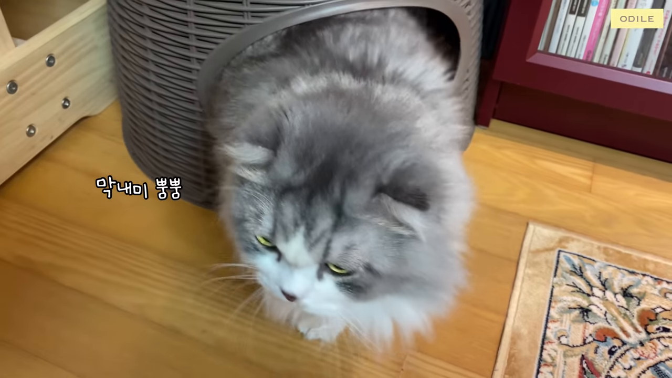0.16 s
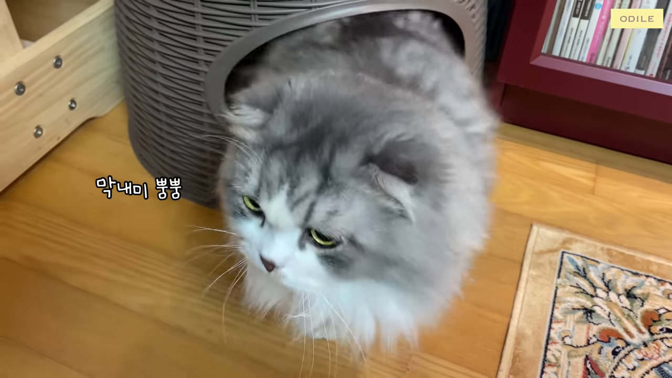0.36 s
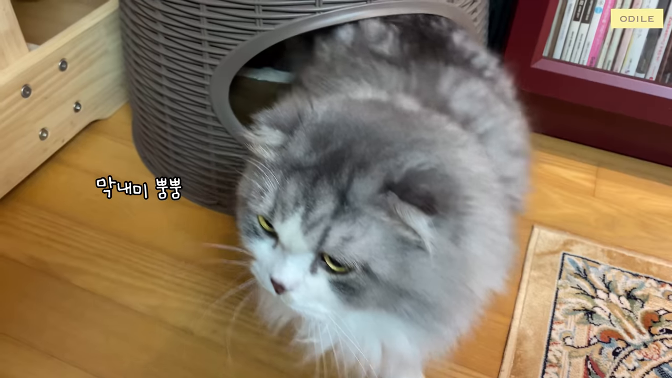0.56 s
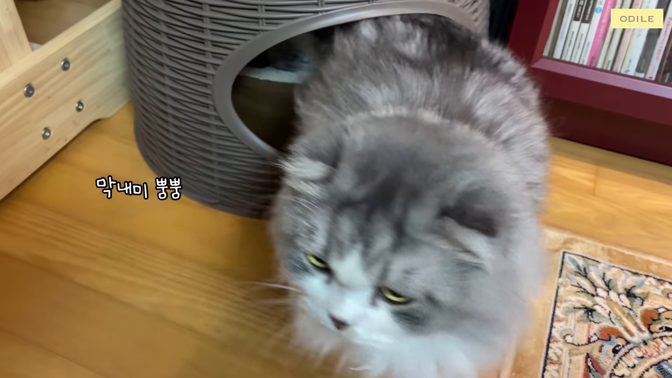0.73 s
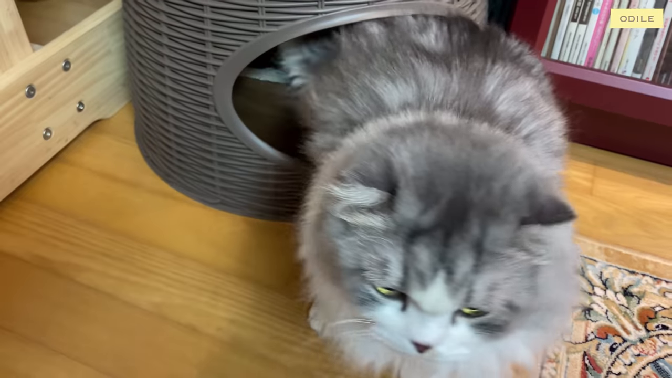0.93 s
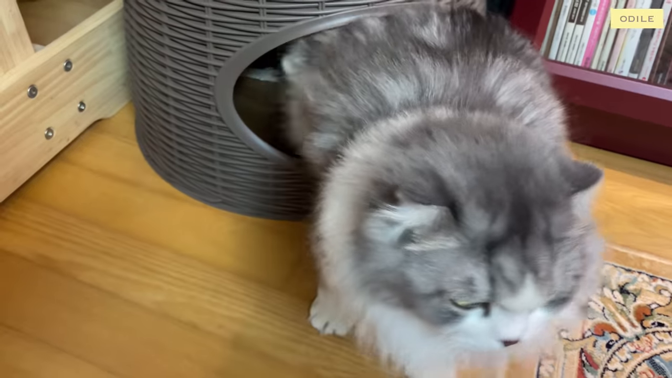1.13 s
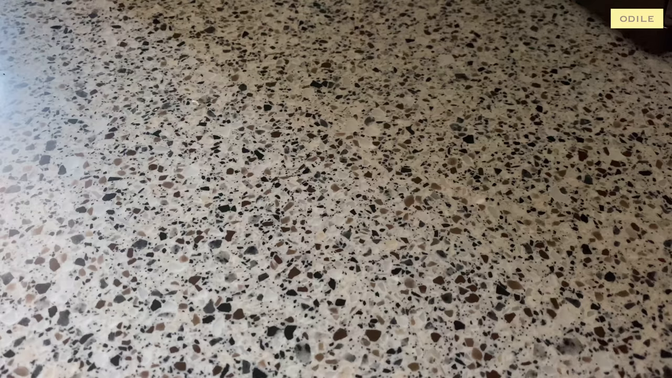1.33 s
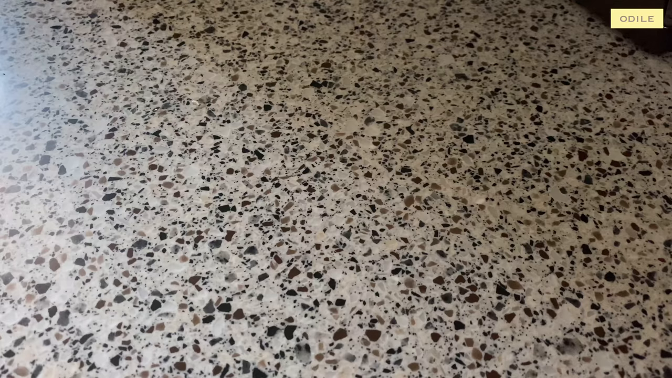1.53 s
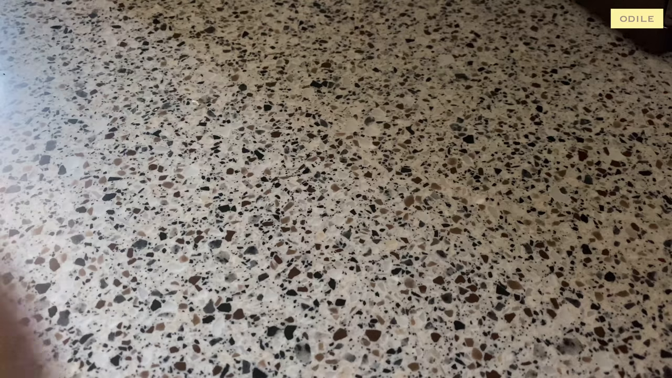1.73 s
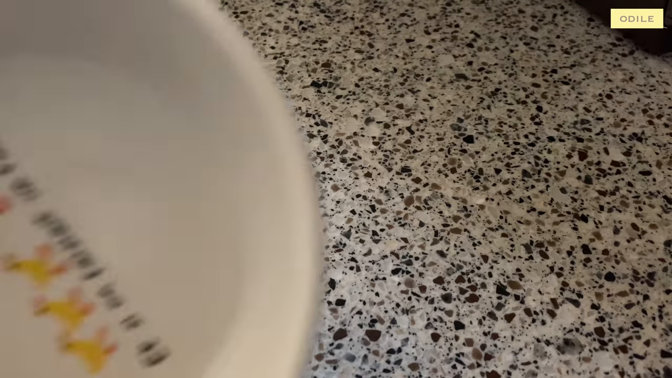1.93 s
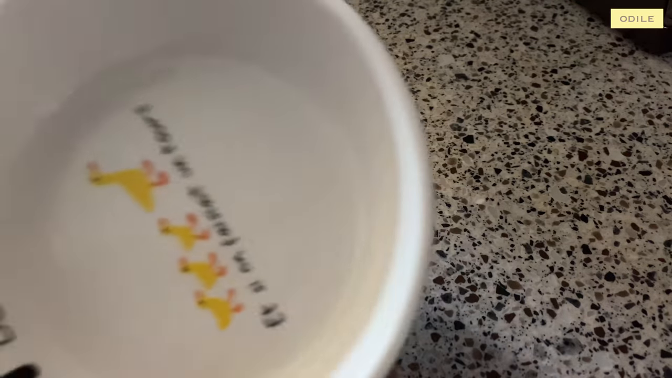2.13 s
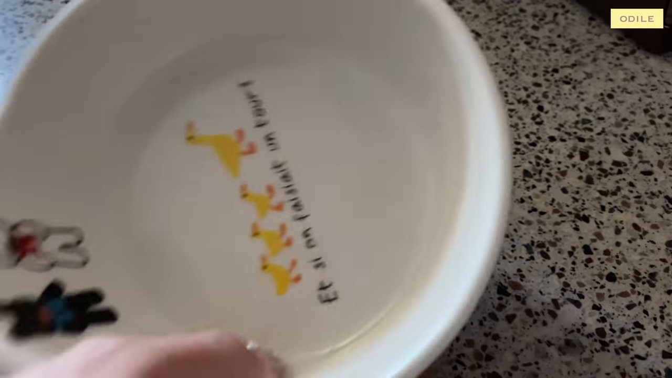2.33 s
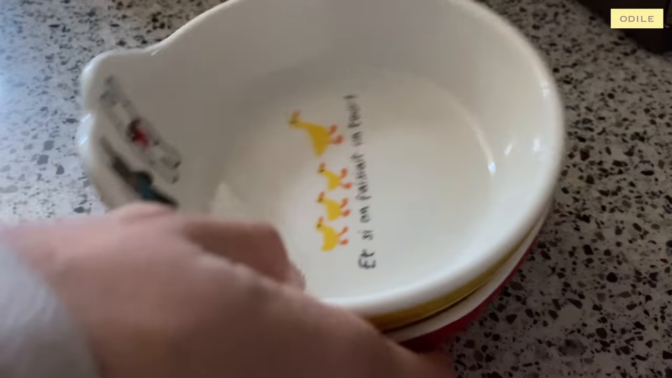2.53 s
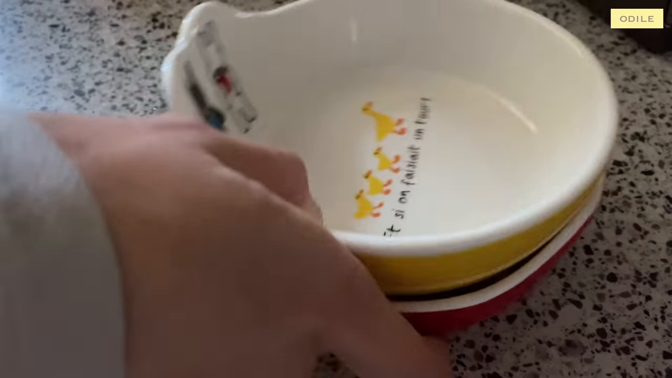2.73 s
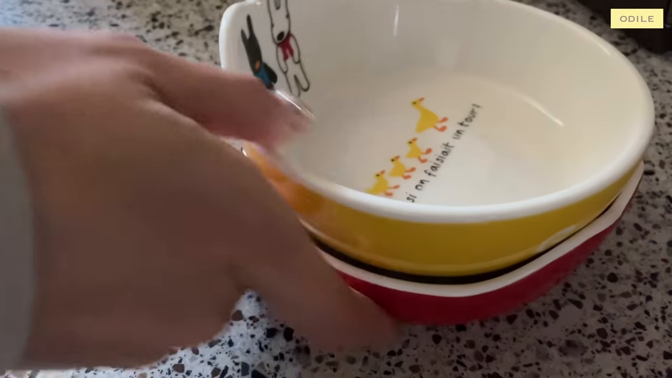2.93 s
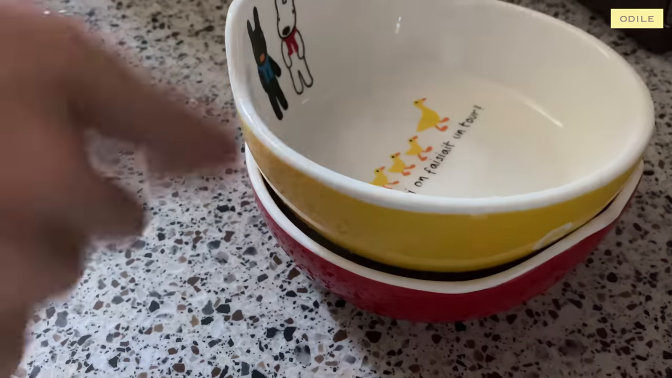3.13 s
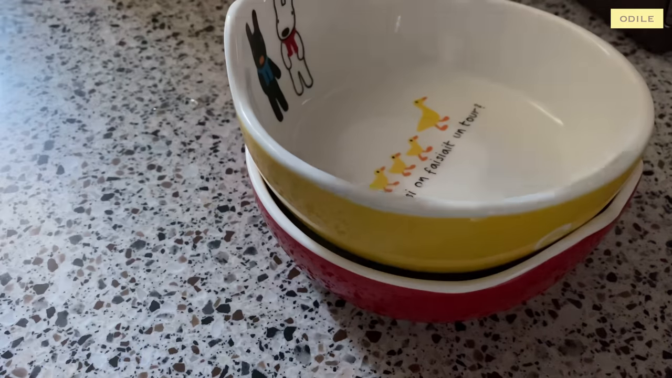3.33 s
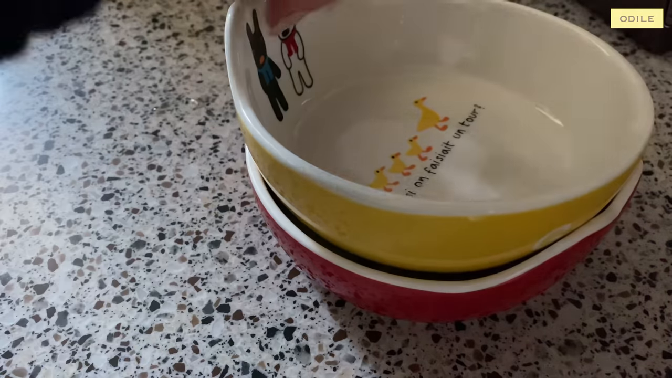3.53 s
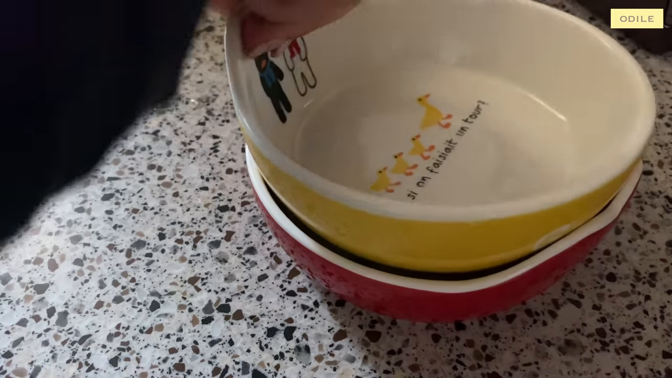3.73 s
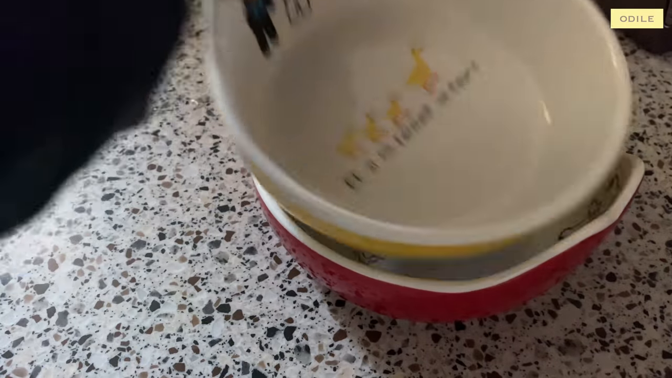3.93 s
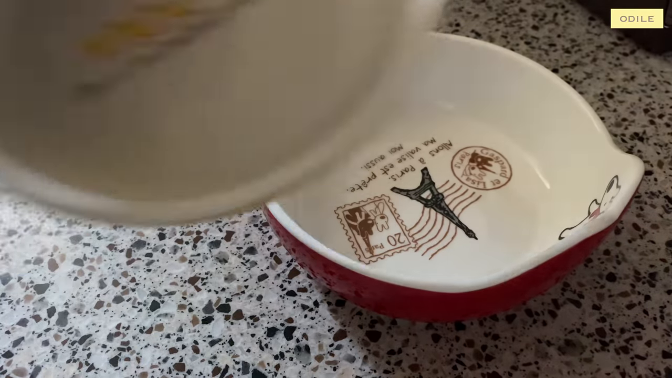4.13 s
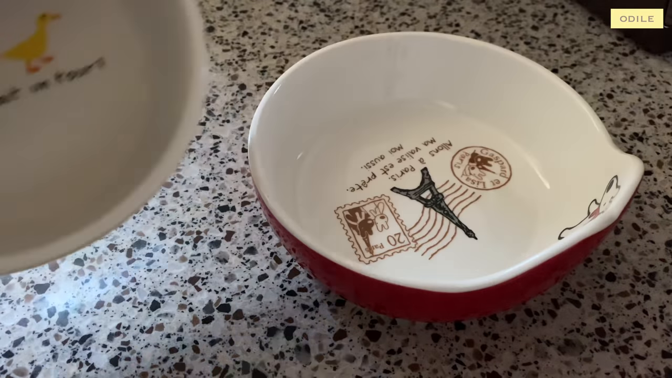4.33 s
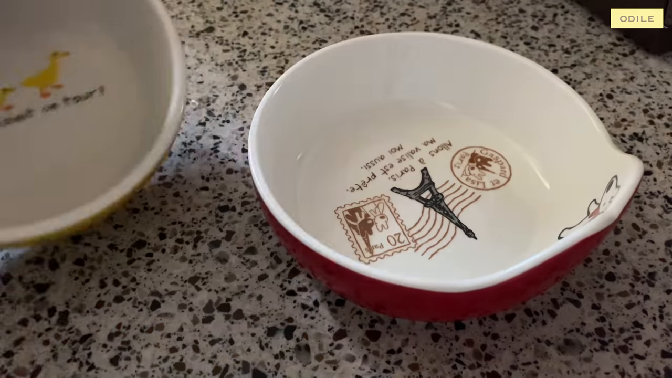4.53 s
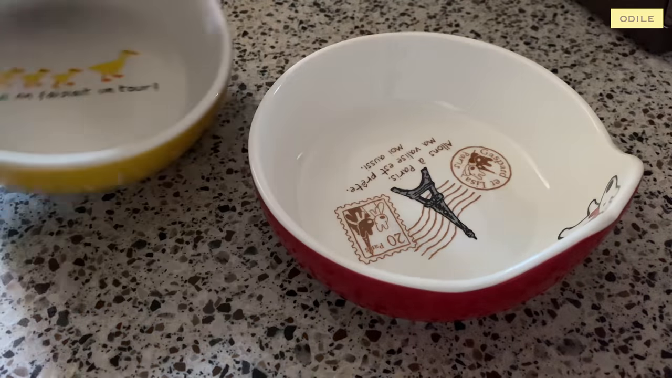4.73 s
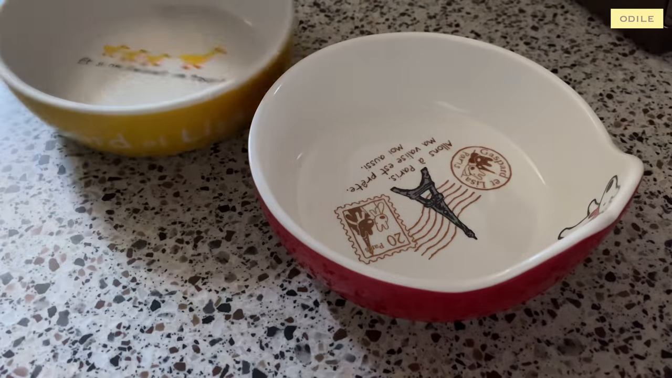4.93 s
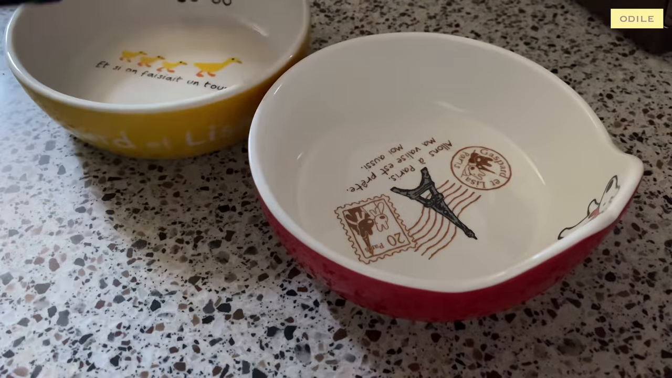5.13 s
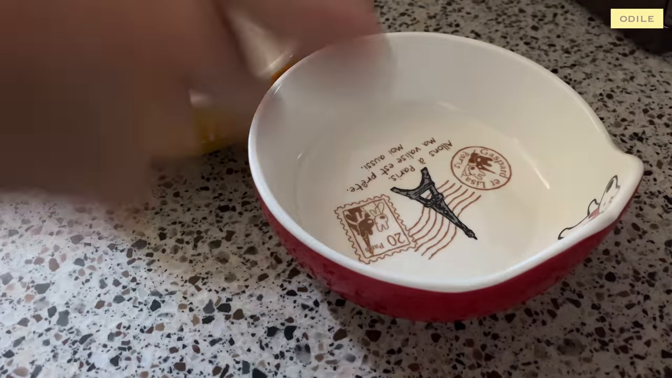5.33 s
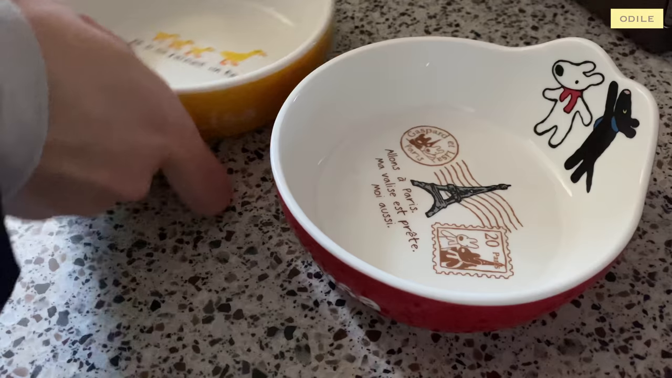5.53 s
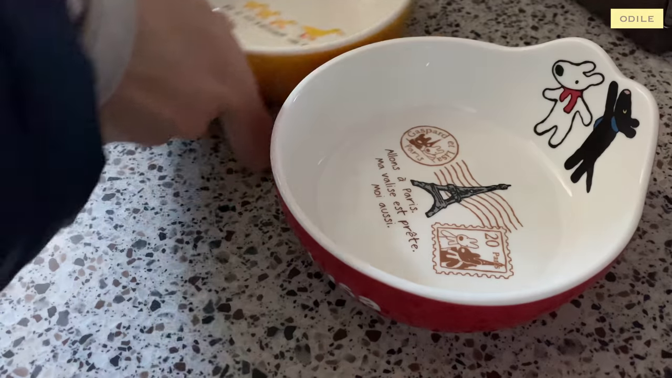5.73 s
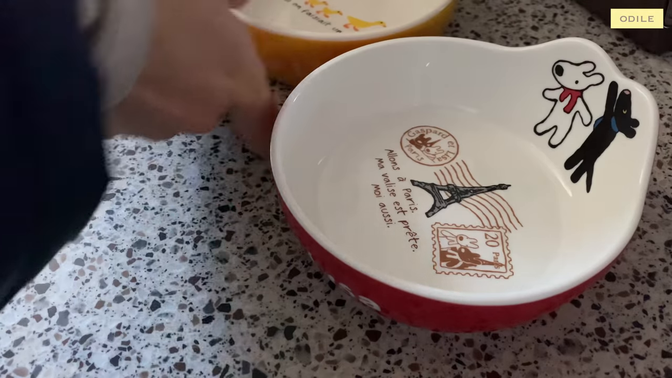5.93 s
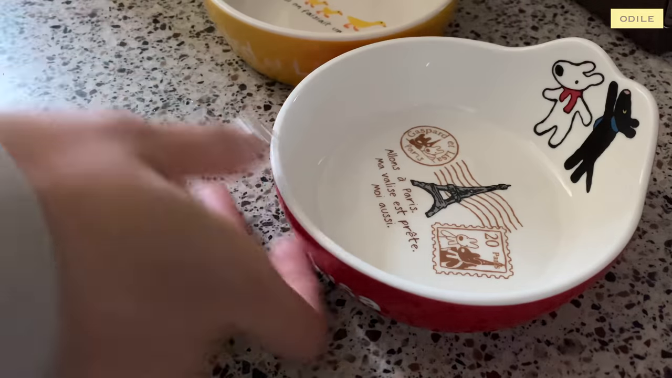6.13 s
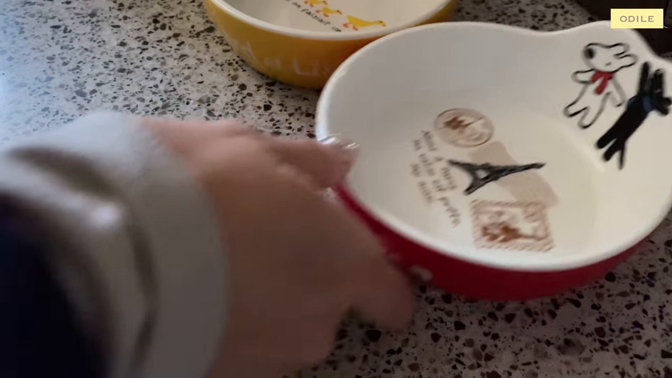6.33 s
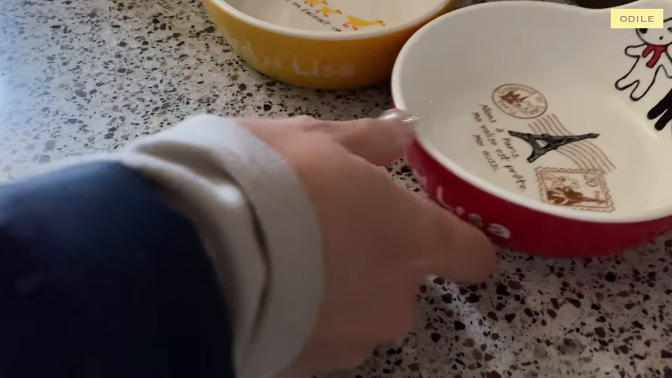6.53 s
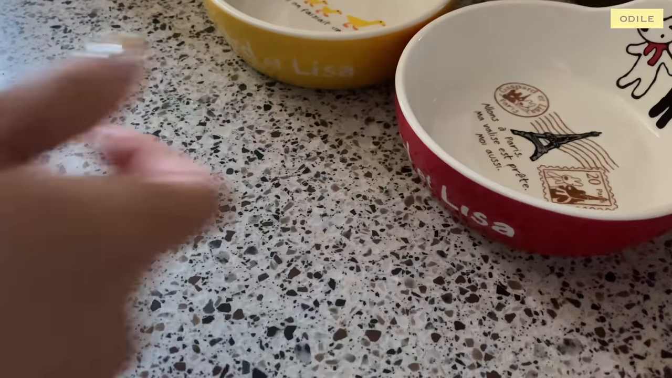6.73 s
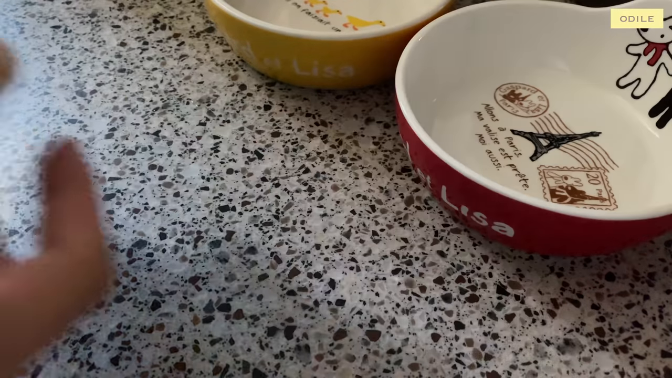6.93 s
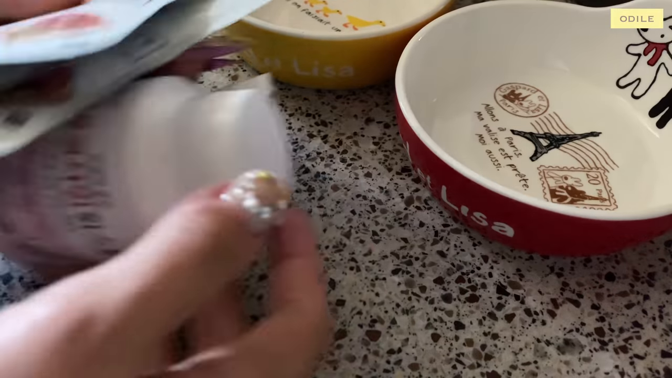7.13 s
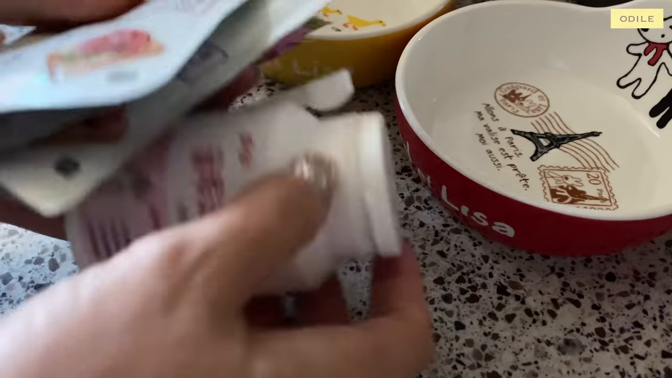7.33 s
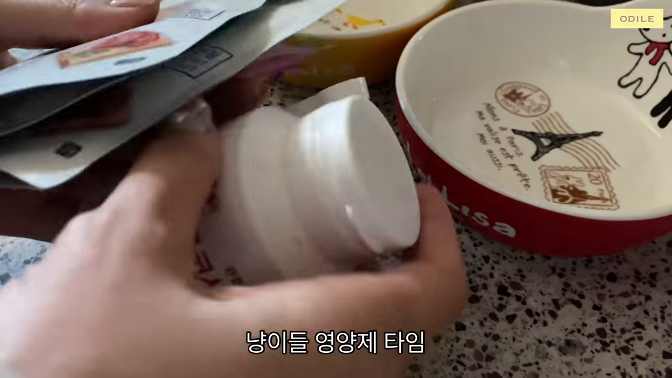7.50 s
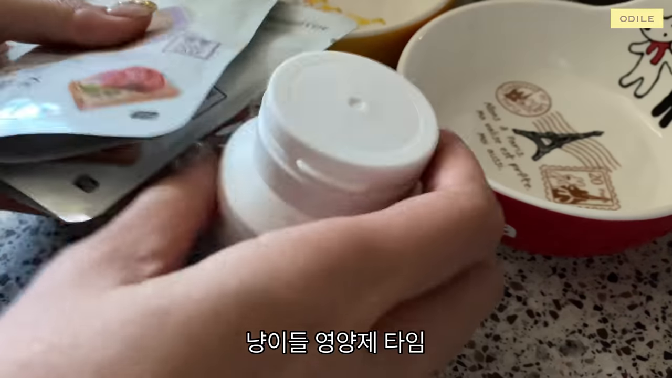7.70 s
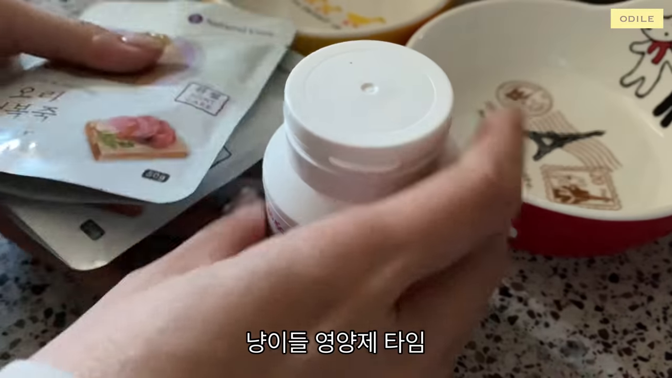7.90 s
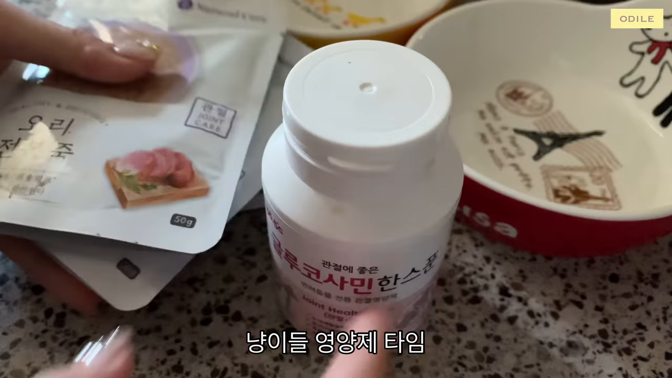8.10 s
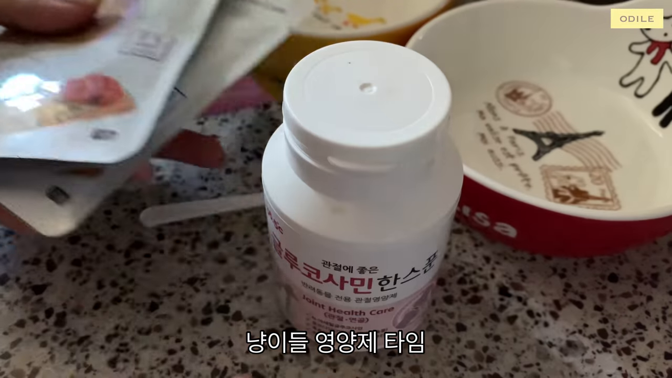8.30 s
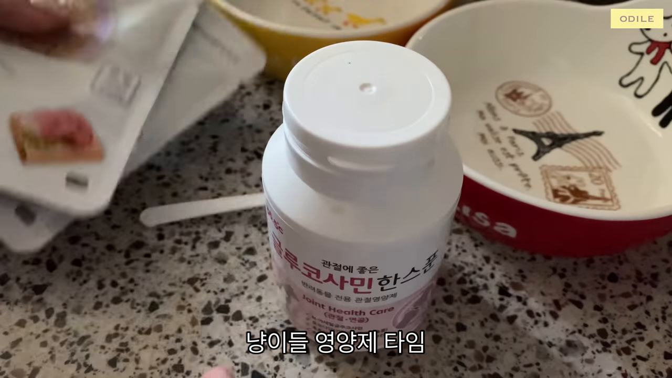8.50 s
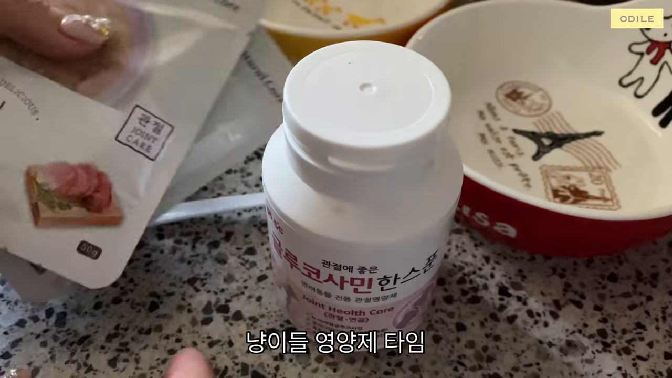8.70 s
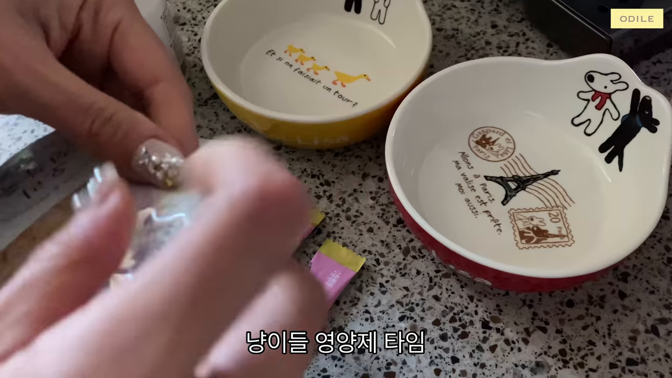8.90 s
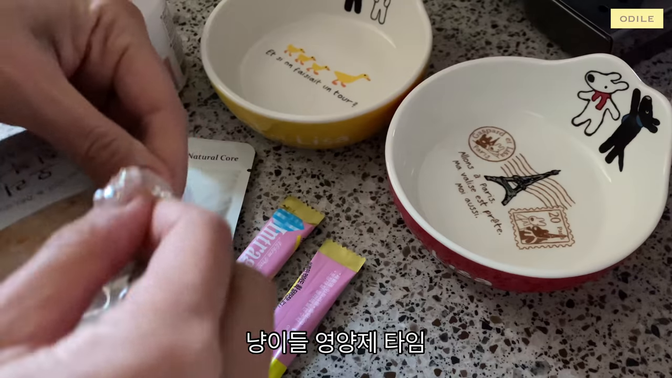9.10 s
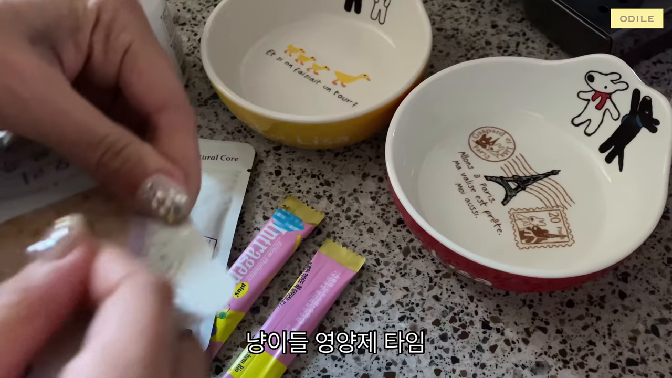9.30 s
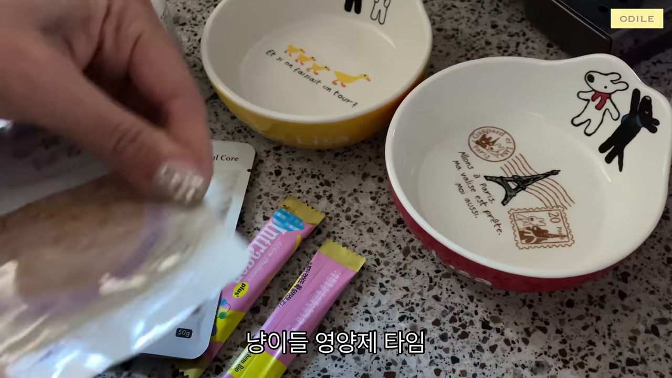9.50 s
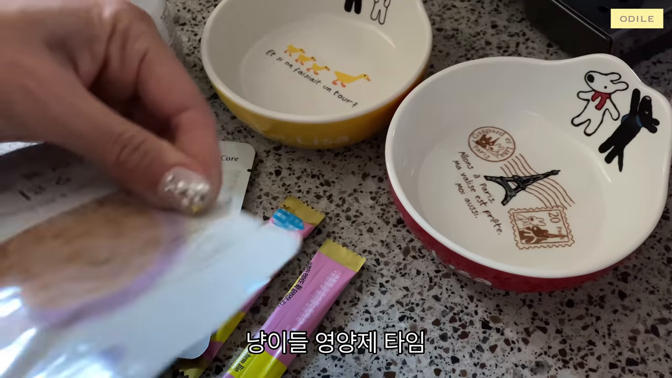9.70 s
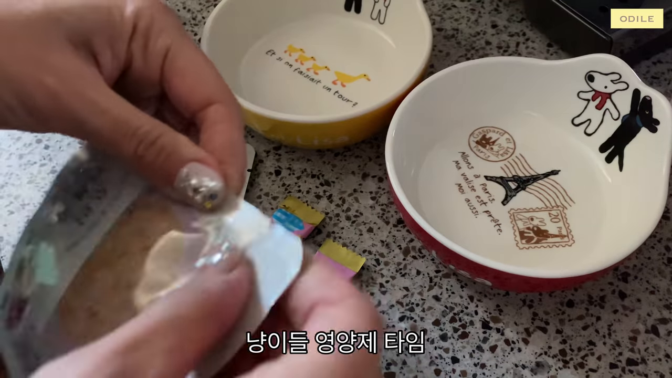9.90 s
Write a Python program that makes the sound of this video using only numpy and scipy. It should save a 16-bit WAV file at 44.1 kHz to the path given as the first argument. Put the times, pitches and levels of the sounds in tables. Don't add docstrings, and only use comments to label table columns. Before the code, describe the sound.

From 0 to 1.3 s, a low fan hum with faint hiss; around 0.45 and 0.8 s a wicker basket is shaken, with soft rumble, creaks and dry strand ticks. The sound cuts to a quiet kitchen with sleeve brushes, close up in stereo with short hard-wall echoes. At 2.1 s nested ceramic bowls land solidly on stone, rattle and slide, then knock sharply at 2.6. Light ticks from 3.6 lead to a bright, longer ringing clink at 3.8 as they part. One bowl lands at 4.4, the other at 4.9, rocking briefly. Gritty turning from 5.5 and a push from 6.15 bring a bright rim knock with quick rebounds at 6.27. Foil rustles from 6.9, with a soft wrist thud at 7.1; a plastic jar lands dully at 7.5 and rocks. Foil creases snap until a short rip at 9.2, then finer crackles to about 9.9.

```python
import sys
import numpy as np
from scipy import signal
from scipy.fft import rfft, irfft, next_fast_len
from scipy.io import wavfile
from scipy.ndimage import uniform_filter1d

SR = 44100
rng = np.random.default_rng(int(sys.argv[2]) if len(sys.argv) > 2 else 0)


def linear_from_db(decibels):
    return 10 ** (np.asarray(decibels, float) / 20)


def bounce(signal):
    frames = np.transpose(np.atleast_2d(signal))
    limited = np.clip(frames, -1, 1)
    pcm = np.round(limited * 32767).astype(np.int16)
    wavfile.write(sys.argv[1], SR, pcm)


N = 438794
CUT_S = 1.31


def unit(x):
    return x / np.sqrt(np.mean(x ** 2))


def add(out, x, s):
    i = int(s * SR)
    out[:, i:i + x.shape[1]] += x[:, :N - i]


def noise(colour, like=0.035, grit_db=0.):
    hz, db = np.transpose(colour)
    size = next_fast_len(N)
    grains = np.minimum(rng.exponential(size=size), 6)
    x = rng.standard_normal((3, size)) * linear_from_db(grit_db * grains)
    like = np.clip(like, 0, 1)
    x = np.sqrt(like) * x[0] + np.sqrt(1 - like) * x[1:]
    bins_hz = np.arange(size // 2 + 1) * SR / size
    gain = linear_from_db(np.interp(np.log(bins_hz + 1), np.log(hz), db))
    spectrum = rfft(x.astype(np.float32)) * gain.astype(np.float32)
    return unit(irfft(spectrum, size)[:, :N])


def flutter(rate_hz, db):
    k = int(SR / rate_hz)
    steps = np.repeat(rng.standard_normal(N // k + 1), k)
    return linear_from_db(db * unit(uniform_filter1d(steps, k)[:N]))


def swells(rows, depth_db, curve, rest_db=(-120, -120)):
    t = np.arange(N) / SR
    power = linear_from_db(np.array(rest_db))[:, None] ** 2 * np.ones(N)
    for start, top, end, *db in rows:
        i = slice(int(start * SR), int(end * SR))
        away = abs(np.interp(t[i], [start, top, end], [-1, 0, 1]))
        gain = linear_from_db(np.array(db)[:, None] - depth_db * away ** curve)
        power[:, i] += gain ** 2 * (1 - away ** 2)
    return np.sqrt(power)


def ring(modes, share, rise_s, spread_db=1.5, turn=0.048, soft_db=0., hold_s=0., late_cycles=0.):
    hz, db, t60 = np.transpose(modes)[:, :, None]
    t60 = t60 * np.clip(share, .1, 1.5)
    t = np.arange(int(SR * (t60.max() + rise_s))) / SR
    size, start, lead = rng.standard_normal((3, len(hz), 1))
    db = db + spread_db * size - soft_db * np.log2(hz / hz[0])
    rise = 1 - np.exp(-t / (rise_s + late_cycles / hz))
    fade = linear_from_db(db - 60 * np.maximum(t - hold_s, 0) / t60) * rise
    phase = 2 * np.pi * hz * t + start
    x = np.array([(fade * np.sin(phase + side * turn * lead)).sum(axis=0) for side in (1, -1)])
    return x / abs(x).max()


def burst(low_hz, soft_db, decay_s):
    t, hz = np.arange(8192) / SR, np.arange(4097) * SR / 8192 + 1
    common, *own = rng.standard_normal((3, len(t)))
    slope = linear_from_db(-np.where(hz > low_hz, soft_db, -12.) * np.log2(hz / low_hz))
    x = irfft(rfft(common + 0.88 * np.array(own)) * slope)
    x = x * np.exp(-t / decay_s) * (1 - np.exp(-t / 0.0077))
    return x / abs(x).max()


# frequency in Hz, level in dB, t60 in seconds.
COUNTER_MODES = [(60.6, -2.5, 0.17), (71.1, 0.5, .17), (81.4, 0, 0.12), (155, 0, 0.2), (150, -1, 0.045),
                 (228, 8.5, 0.038)]


def contacts(body, glaze, hits, soft_db, crack_db, clatter_db, grip_db=-26.5):
    grip_s, roll_s = 0.011, .0055
    out = np.zeros((2, N))
    for s, body_db, clink_db, thud_db, share in hits:
        knock = ring(body, share, rise_s=0.00055, hold_s=roll_s, late_cycles=0.79)
        free = np.exp(-(np.arange(knock.shape[1]) / SR / grip_s) ** 3)
        knock = knock * (free + linear_from_db(grip_db) * (1 - free))
        clack = burst(500., 7.5 + soft_db / 2, decay_s=0.0068)
        clatter = burst(310.0, 7.0 + soft_db / 3, decay_s=0.01)
        clink = ring(glaze, share, rise_s=0.00023, spread_db=0.2, turn=0.42, soft_db=soft_db)
        crack = burst(2000., 7.5 + soft_db, decay_s=0.0045)
        thud = ring(COUNTER_MODES, share, rise_s=0.0021, turn=0.027)
        add(out, linear_from_db(body_db) * knock, s)
        add(out, linear_from_db(body_db - 7.5) * clack, s)
        add(out, linear_from_db(body_db + clatter_db) * clatter, s + 0.0082)
        add(out, linear_from_db(clink_db) * clink, s)
        add(out, linear_from_db(clink_db + crack_db) * crack, s)
        add(out, linear_from_db(thud_db) * thud, s + 0.0031)
    return out


def pops(rows):
    out, t = np.zeros((2, N)), np.arange(SR // 30) / SR
    for s, db, hz, treble_db in rows:
        chance = rng.standard_normal((2, len(t)))
        band = signal.butter(1, [hz * 0.38, hz * 1.65], "band", fs=SR)
        pop = signal.lfilter(*band, chance) * np.exp(-t / (0.0019 + 1.3 / hz))
        spit = np.diff(chance, n=2, prepend=[[0, 0], [0, 0]]) * np.exp(-t / 0.0018)
        add(out, linear_from_db(db) * pop / abs(pop).max() + linear_from_db(treble_db) * spit / abs(spit).max(), s)
    return out


def song(modes, rows, sag=0.):
    out, span = np.zeros(N), slice(int(rows[0][0] * SR), int(rows[-1][2] * SR))
    share = np.linspace(0, 1, span.stop - span.start)
    swell = flutter(16, 3.5)
    for hz, db, t60 in modes:
        rub = rng.standard_normal((2, len(share)))
        rub = signal.lfilter([1], [1, -linear_from_db(-60 / (t60 * SR))], rub)
        phase = 2 * np.pi * np.cumsum(hz * (1 - sag * share ** 2)) / SR
        mode = rub[0] * np.cos(phase) + rub[1] * np.sin(phase)
        out[span] += linear_from_db(db) * unit(mode) * np.roll(swell, rng.integers(N))[span]
    return out / np.sqrt(np.sum(linear_from_db(np.array(modes)[:, 1]) ** 2))


# start, strongest and end in seconds, rumble in dB, wicker in dB.
BASKET_SHAKES = [
    (.44, .48, 0.73, -47, -47.5),
    (.73, .83, 1, -43.5, -40),
    (1.13, 1.2, 1.34, -56, -65.5),
]
# frequency in Hz, density in dB.
HUM_COLOUR = [(30, -2), (64, -6.5), (227, -7.5), (437, -1), (632, -17), (1100, -15), (6500, -45.5),
              (16000, -61)]


def first_room():
    t = np.arange(N) / SR
    here = t < CUT_S
    shake, wicker = swells(BASKET_SHAKES, depth_db=18.0, curve=1.36, rest_db=(-120, -83)) * here
    fan = linear_from_db(-48 - 4 * np.minimum(t, CUT_S)) * here
    hum = np.hypot(shake, fan) * flutter(10, 1.8) * noise(HUM_COLOUR, like=0.4)
    creak = noise([(300, 4.5), (1000, 2.0), (2500, -8.0), (6000, -15.5), (15000, -40)], grit_db=3.5, like=0.095)
    hiss = (t < .99) * linear_from_db(-70.5) * noise([(2500, -10), (7000, -6), (12000, -7), (15000, 1)])
    return hum + wicker * flutter(40, 2.) * creak + hiss


# start in seconds, peak in dB, centre in Hz, treble peak in dB.
WICKER_TICKS = [
    (0.4648, -35.5, 1260, -59),
    (0.5262, -43, 1210, -66),
    (0.5846, -41.5, 1230, -79),
    (0.7262, -58, 1360, -80),
    (0.7437, -40, 1260, -49),
    (0.8046, -31, 2570, -53),
    (0.8684, -42, 1550, -67),
]
# frequency in Hz, level in dB, t60 in seconds.
BASKET_MODES = [(314.4, 2, 0.016), (411, 3, 0.012), (1179, -10, 0.018)]
# frequency in Hz, level in dB, t60 in seconds.
DULL_MODES = [(2160, 0, 0.0062), (2430, 0, 0.017)]
# start in seconds, body, clink and thud peaks in dB, ring time share.
BASKET_HITS = [
    (.466, -30.5, -37, -58, 0.19),
    (.81, -37, -28.5, -63, 0.56),
    (.828, -32.5, -47, -41.5, 0.94),
    (1.199, -53, -48, -43.5, 0.73),
]


def basket():
    return contacts(BASKET_MODES, DULL_MODES, BASKET_HITS, 5, -3.5, -22) + pops(WICKER_TICKS)


# start, strongest and end in seconds, lean in dB, sleeve in dB.
ARM_MOVES = [(1.33, 1.42, 1.43, -64, -80), (1.7, 1.77, 1.77, -64, -73), (1.88, 1.95, 2.05, -68, -75),
             (5.9, 6.0, 6.12, -57, -65.5), (9.17, 9.24, 9.2, -46, -85), (2.1, 2.3, 2.5, -45.5, -91),
             (2.3, 2.6, 3.2, -50, -65), (2.9, 3.2, 3.52, -76, -69), (3.55, 3.75, 3.95, -43, -74.5),
             (4.4, 4.7, 4.95, -53, -65.5), (4.9, 5.15, 5.414, -57.5, -61.5),
             (5.45, 5.65, 5.96, -57.5, -59.5), (5.85, 6.05, 6.4, -64, -69.5), (6.4, 6.75, 6.91, -82, -67),
             (7.4, 7.9, 8.15, -58, -69), (8.4, 8.8, 9.1, -60, -86)]
# frequency in Hz, density in dB.
SLEEVE_COLOUR = [(180, -20.5), (300, -12), (1540, -13.5), (7500, -30.5), (9750, -42.5), (16500, -120)]


def kitchen_air():
    here = np.arange(N) / SR >= CUT_S
    lean, sleeve = swells(ARM_MOVES, depth_db=12, curve=1.7, rest_db=(-63.5, -77.5)) * here
    rumble = noise([(30, 3.0), (55, 3.5), (150, 0), (300, -5.0), (700, -21.0), (1500, -45.0)], like=.9)
    sheen = noise([(800, -16.5), (3000, -9.0), (7000, -3.5), (15000, -11.0)], like=0.042)
    brush = linear_from_db(5) * noise(SLEEVE_COLOUR, like=0.11) + sheen
    return lean * flutter(10, 1.8) * rumble + sleeve * brush


# frequency in Hz, level in dB, t60 in seconds.
STACK_MODES = [(246, -0.5, 0.084), (370, -11.5, 0.228), (588, -11.5, 0.07), (667, 3, 0.083),
               (1078, -9, 0.053), (1496, -10, .04)]
RATTLE_MODES = [(280, -1, 0.21), (667, 1.5, 0.04), (1090, -13, .04), (1300, -13.5, .04)]
KNOCK_MODES = [(706, 1, 0.047), (954, -7, .04), (1217, -9, .03), (1952, -8, .025)]
UPPER_GLAZE = [(2207, 1, .04), (2751, -3, .04), (3042, -3, .16), (3994, -3, .05), (4775, -6, .08),
               (5512, -4, .19), (6804, -8, .05), (7311, -4, .07), (7957, -10, .08), (9803, -5, .07),
               (10590, -12, .16), (14530, -12, .06)]
# start in seconds, body, clink and thud peaks in dB, ring time share.
STACK_HITS = [
    (2.095, -5, -24, -20, 0.54),
    (2.763, -29.5, -45, -29, 0.54),
]
RATTLE_HITS = [(2.275, -38, -60.5, -51.5, .5), (2.348, -39, -52.5, -50.5, .5), (2.386, -19.5, -37, -42, .3),
               (2.42, -26, -47, -42.5, .6), (2.450, -23.5, -50, -39.5, .37), (2.465, -28, -50.5, -41.5, .4),
               (2.502, -29.5, -50, -36, .54), (2.542, -31, -55, -33.5, .4), (2.568, -32.5, -53.5, -36, .4),
               (2.814, -33, -69, -40, 0.48), (4.799, -27.5, -51.5, -44, .6), (4.842, -27.5, -58, -46, .6),
               (4.875, -32.5, -60.5, -48, .6)]
KNOCK_HITS = [
    (2.593, -3, -9.5, -21.5, 0.74),
]


def nested_bowls():
    down = contacts(STACK_MODES, UPPER_GLAZE, STACK_HITS, 12, -3.5, -20)
    rattle = contacts(RATTLE_MODES, UPPER_GLAZE, RATTLE_HITS, 2.5, -10, -22)
    knock = contacts(KNOCK_MODES, UPPER_GLAZE, KNOCK_HITS, 2.2, -5, -34, grip_db=-34)
    return down + rattle + knock


# start, strongest and end in seconds, grind in dB, ring in dB.
STACK_SLIDES = [
    (2.11, 2.24, 2.38, -54, -53),
    (2.3, 2.46, 2.63, -45, -50),
    (2.74, 2.8, 2.97, -47, -48),
]
PART_SCRAPE = [
    (3.72, 3.79, 3.835, -51, -56.5),
]
SETTLES = [
    (4.412, 4.431, 4.715, -31, -44.5),
    (4.74, 4.81, 5, -37, -41.5),
    (4.895, 4.921, 4.93, -26.5, -36),
    (5.04, 5.06, 5.18, -36, -71),
]
TURN = [
    (5.524, 5.535, 5.76, -48.5, -45),
    (5.62, 5.8, 5.93, -49.5, -52.5),
]
RIM_NOTE = [
    (5.72, 5.77, 5.93, -85, -63),
]
PUSH = [
    (6.14, 6.2, 6.3, -51, -50),
    (6.3, 6.4, 6.57, -44.5, -45),
]
RELEASE = [
    (6.44, 6.5, 6.65, -68, -59),
]
# frequency in Hz, level in dB, t60 in seconds.
NESTED_MODES = [(680, 12, .045), (1950, -2, .04), (3040, -7, .08), (4700, -12, .06), (5510, -10, .1),
                (7330, -9, .1), (10600, -9, .12)]
LOOSE_GLAZE = [(2310, -5, .05), (3020, -9, .07), (4860, -4, .06), (5630, -11, .05), (7340, -8, .09),
               (7700, -9, .07), (8170, -9, .05), (10600, -12, .1), (13100, -11, .07), (13800, -7, .07),
               (14500, -8, .08)]
SETTLED_MODES = [(640, 8, .045), (2250, 7, .06), (4830, -14, .04), (5505, -9, .14), (7900, -16, .08)]
TURNED_MODES = [(800, 0, .02), (1500, 2, .035), (2300, 1, .04), (3000, -10, .03), (4900, -12, .05),
                (5510, -13, .07), (7870, -9, .1), (11300, -8, .1), (13850, -11, .1), (14550, -11, .1)]
RIM_MODE = [(4950, 0, 0.086)]
PUSHED_MODES = [(555, 6, .045), (2060, 5, .12), (2390, -1, .05), (4230, 1, .07), (4900, -6, .08),
                (6790, -15, .07), (7420, -13, .08), (10600, -14, .12)]
RELEASED_MODES = [(1855, 0, .25), (4700, -16, .08)]
# frequency in Hz, density in dB.
GRIND_COLOUR = [(120, -25.5), (200, 4), (898, -0.5), (1080, -5), (1830, -6), (4910, -32.5), (11000, -70)]


def slides():
    # (movements, depth dB, curve, modes, share of pitch lost as the hand bears down)
    moves = [(STACK_SLIDES, 16, 1.1, NESTED_MODES, 0),
             (PART_SCRAPE, 8, 2.2, LOOSE_GLAZE, 0),
             (SETTLES, 24, .8, SETTLED_MODES, 0),
             (TURN, 8, 3.0, TURNED_MODES, 0),
             (RIM_NOTE, 10, 1.5, RIM_MODE, 0.0244),
             (PUSH, 12, 2.2, PUSHED_MODES, 0.032),
             (RELEASE, 15, 1.5, RELEASED_MODES, 0)]
    grind = bright = sung = 0
    for rows, depth_db, curve, modes, sag in moves:
        rough, ringing = swells(rows, depth_db, curve)
        grind = grind + rough
        bright = bright + ringing
        sung = sung + ringing * song(modes, rows, sag)
    hiss = linear_from_db(-13.0) * noise([(1200, -28.5), (2000, 5.5), (5000, -11.5), (16000, -21.5)], grit_db=2.5)
    stone = flutter(50, 2.5) * noise(GRIND_COLOUR, like=0.2, grit_db=0.5)
    return grind * stone + linear_from_db(-1.5) * sung + bright * hiss


# frequency in Hz, level in dB, t60 in seconds.
LIFTED_MODES = [(690, 0, .07), (830, -4, .07), (1300, -3, .04)]
PARTED_MODES = [(689, 0, .06), (818, -1, .15)]
FREE_GLAZE = [(1852, -24, .8), (1986, -14, .28), (2213, -8, .045), (3020, -15, .12), (3986, 1, .05),
              (4204, -6, .1), (4350, -9, .07), (4960, -11, .06), (6702, -13, .22), (6821, -4, .09),
              (7386, -8, .1), (9674, -11, .12), (10650, -14, .13), (14400, -8, .08)]
# start in seconds, body, clink and thud peaks in dB, ring time share.
LIFT_HITS = [
    (3.551, -47, -73, -51.5, 0.13),
    (3.588, -47.5, -32, -45.5, 0.76),
    (3.627, -40, -39.5, -26, 0.34),
    (3.64, -36, -36.5, -29, 0.18),
    (3.725, -30.5, -40.5, -27.5, .7),
    (3.793, -31, -42.5, -37, .6),
]
FREE_HITS = [
    (3.830, -9, -10.5, -35.5, 0.96),
]


def parted_bowls():
    lift = contacts(LIFTED_MODES, LOOSE_GLAZE, LIFT_HITS, .6, -11, -22)
    return lift + contacts(PARTED_MODES, FREE_GLAZE, FREE_HITS, 1.5, -8, -30, grip_db=-6)


# frequency in Hz, level in dB, t60 in seconds.
FIRST_MODES = [(250, 7, 0.088), (328.8, 2, .1), (1004, 6.4, 0.033), (1389, 8, 0.022), (1720, 1, .03),
               (1980, 1.9, 0.027), (2250, 2, 0.019)]
SECOND_MODES = [(295, 7, 0.076), (625, 5.5, 0.079), (980, 7, 0.055), (1456, 10.5, 0.043), (1800, 2, .04),
                (2124, 6, 0.086), (2370, 1, 0.072)]
LONE_GLAZE = [(2650, 2, .03), (3063, 0, .06), (3461, -4, .025), (4850, -1, .035), (5505, -5, .22),
              (7900, -14, .1), (10650, -12, .07), (14520, -14, .07)]
# start in seconds, body, clink and thud peaks in dB, ring time share.
FIRST_HITS = [
    (4.422, -27.5, -49.5, -49.5, .4),
    (4.432, -2.5, -12.5, -14.5, 0.57),
    (4.457, -20, -44, -22.5, 0.46),
]
SECOND_HITS = [
    (4.913, -19.5, -45.5, -49.5, .3),
    (4.922, -1, -14, -20, 0.55),
    (4.944, -15.5, -52.5, -43, 0.13),
    (5.032, -21.5, -35.5, -40, 0.25),
    (5.06, -29, -60, -36, .4),
]


def bowls_set_down():
    first = contacts(FIRST_MODES, LONE_GLAZE, FIRST_HITS, 7, -2, -22)
    return first + contacts(SECOND_MODES, LONE_GLAZE, SECOND_HITS, 5, 0, -22)


# frequency in Hz, level in dB, t60 in seconds.
RIM_MODES = [(342, 5, 0.11), (631, 10, 0.023), (1246, -1, .05)]
LOWER_GLAZE = [(1985, -15, .2), (2390, 3, .11), (4145, -1, .1), (4885, -2, .1), (6705, -3, .07),
               (7375, -18, .12), (7865, -10, .12), (9674, -2, .07), (11290, -18, .13), (13830, -15, .13),
               (14545, -6, .1)]
# start in seconds, body, clink and thud peaks in dB, ring time share.
RIM_HITS = [
    (5.486, -37, -65, -41, 0.77),
    (5.653, -38, -70, -49, 0.84),
    (5.848, -30.5, -65, -42, 0.58),
    (6.165, -41, -57.5, -54.5, 0.65),
    (6.2694, -7, -7, -37, 1),
    (6.298, -16, -18.5, -51.5, 1),
    (6.314, -25, -23.5, -54.5, 1),
]


def rim_knocks():
    return contacts(RIM_MODES, LOWER_GLAZE, RIM_HITS, 1.5, -11, -22)


# start, strongest and end in seconds, rustle in dB, treble in dB.
RUSTLES = [(6.9, 7.07, 7.37, -62.5, -58), (7.18, 7.4, 7.46, -64.5, -58.5), (7.485, 7.52, 7.59, -60, -53),
           (7.63, 7.8, 7.84, -57, -55), (7.86, 7.89, 7.93, -53.5, -59), (7.92, 8.0, 8.2, -58, -63),
           (8.24, 8.4, 8.48, -62.5, -61), (8.49, 8.55, 9.03, -65.5, -68.5), (8.68, 8.88, 9.35, -63.5, -64),
           (9.28, 9.44, 9.57, -58.5, -54.5), (9.61, 9.64, 9.64, -56, -56.5), (9.66, 9.69, 9.73, -58, -58.5),
           (9.745, 9.785, 9.8, -55.5, -61.5), (9.815, 9.845, 9.9, -52.5, -55)]
TEAR = [
    (9.18, 9.2, 9.333, -40.5, -43.5),
]


def foil():
    squeeze, tear = swells(RUSTLES, depth_db=6.5, curve=1.11), swells(TEAR, depth_db=17.0, curve=0.9)
    rustle, treble = np.hypot(squeeze, tear)
    low = noise([(150, -22.5), (500, -3), (1200, -6.5), (2500, -20)], grit_db=4.5, like=.27) * flutter(40, 2.5)
    mid = noise([(1000, -23.5), (2500, -3.5), (4500, -5.0), (8000, -32.0)], grit_db=3.5, like=0.3)
    mid = mid * flutter(25, 4.2)
    ticks = noise([(500, -15), (3000, 0), (9000, -20)], grit_db=9.) * flutter(30, 5.)
    top = noise([(3000, -34.5), (5500, -2.5), (9000, -1.0), (15000, -6.5)], grit_db=2.0) * flutter(40, 1.4)
    crackle = linear_from_db(-2.0) * low + linear_from_db(-2.5) * mid + linear_from_db(-8.5) * ticks
    return linear_from_db(np.array([[1.8], [-1.8]])) * rustle * crackle + treble * top


# frequency in Hz, level in dB, t60 in seconds.
WRIST_MODES = [(56.3, 1, 0.24), (87.8, 2, 0.13), (140.3, -2.5, 0.066), (236, -4.5, 0.062)]


def wrist():
    out = np.zeros((2, N))
    add(out, linear_from_db(-26) * ring(WRIST_MODES, 0.71, rise_s=0.0038, turn=0.13), 7.075)
    return out


# start in seconds, peak in dB,
# centre in Hz, treble peak in dB.
FOIL_SNAPS = [(7.379, -18.5, 3500, -35.5), (7.4888, -24.5, 4470, -66), (7.767, -14, 5900, -51),
              (7.8073, -32.5, 2910, -50), (7.860, -26, 3500, -52), (7.872, -26.5, 4230, -56),
              (7.9168, -35.5, 2290, -45), (8.038, -28.5, 3004, -34), (8.516, -26, 4418, -39),
              (8.767, -31, 2440, -59), (8.7987, -30, 1980, -70.5), (8.857, -24, 3980, -41),
              (9.201, -26.5, 3770, -33), (9.3715, -31, 1730, -37), (9.5882, -38, 3230, -37),
              (9.623, -30.5, 2160, -45), (9.7858, -33, 4250, -55.5), (9.8246, -34.5, 4250, -65),
              (7.42, -39, 1800, -62), (7.955, -32, 1470, -60), (8.007, -33.5, 2570, -51),
               (8.257, -46, 3000, -47), (7.397, -35, 5950, -46), (7.407, -37, 5000, -56),
               (7.942, -36.5, 5000, -51), (7.36, -47.5, 1490, -65), (8.9455, -37, 2840, -61.5),
               (9.0428, -43, 3790, -58), (9.0915, -40.5, 2278, -63), (9.128, -43.5, 6000, -54),
               (9.3716, -26, 880, -60), (9.588, -29, 998, -52), (9.6876, -37, 956, -50),
               (9.741, -53, 1140, -63), (9.826, -35.5, 890, -60),
              (8.295, -46, 2850, -64), (8.3781, -39.5, 4560, -60), (8.4124, -40, 4480, -60),
                 (8.44, -46.5, 3500, -62), (9.655, -44, 3800, -60.5), (9.6852, -45, 3180, -60),
                 (9.752, -48, 3610, -60), (9.84, -40, 4000, -60), (9.862, -48, 3500, -60),
                 (9.885, -44, 4300, -60)]


def foil_snaps():
    return pops(FOIL_SNAPS)


# frequency in Hz, level in dB, t60 in seconds.
JAR_MODES = [(292, -0.5, 0.028), (421, -5, 0.052), (605, -8.5, 0.11), (1019, -14.5, 0.011)]
# start in seconds, body, clink and thud peaks in dB, ring time share.
JAR_HITS = [
    (7.539, -16.5, -31, -29.5, 0.37),
    (7.65, -25, -40.5, -33, 0.82),
    (7.75, -30, -42, -35.5, 0.5),
    (7.776, -33.5, -60, -38, .8),
    (7.8, -42, -60, -43, 0.59),
    (8.515, -48, -35, -38.5, 0.43),
]


def jar():
    return contacts(JAR_MODES, DULL_MODES, JAR_HITS, 8, -3.5, -22)


# centre in Hz, t60 in seconds, level in dB.
ROOM_BANDS = [(122.3, 0.25, -21), (386, 0.17, -28), (1320, 0.28, -15), (3500, 0.22, -14), (9000, 0.26, -20)]


def room(x):
    scatter_hz = 350
    t, tail = np.arange(SR // 2) / SR, 0
    for hz, t60, db in ROOM_BANDS:
        common, *own = rng.standard_normal((3, len(t)))
        both = common + min((hz / 440.0) ** 2, 1.5) * np.array(own)
        band = signal.lfilter(*signal.butter(1, [hz / 2, hz * 2.25], "band", fs=SR), both)
        band = band * linear_from_db(-60 * t / t60) * (1 - np.exp(-t / 0.0018))
        tail = tail + linear_from_db(db) * band / np.sqrt(np.sum(band ** 2) * 2 * hz / SR)
    drift = np.cumsum(rng.standard_normal(N)) * np.sqrt(2 * np.pi * scatter_hz / SR)
    blur = np.sqrt(2) * np.cos(drift)
    whole = x.mean(axis=0)
    body = signal.filtfilt(*signal.butter(2, [330, 2600], "band", fs=SR), whole)
    sent = whole + (blur - 1) * body
    return signal.oaconvolve(sent[None], tail * linear_from_db(-16.5), axes=1)[:, :N]


def scene():
    sharp = basket() + nested_bowls() + parted_bowls() + bowls_set_down() + rim_knocks()
    sharp = sharp + wrist() + foil_snaps() + jar()
    return sharp + room(sharp) + first_room() + kitchen_air() + slides() + foil()


def low_pass(x):
    return signal.sosfilt(signal.butter(12, 16500, fs=SR, output="sos"), x)


# frequency in Hz, left lead in radians.
PORT_PHASE = [(0, .2), (900, .9), (2000, 1.6), (3500, 1.2), (6200, 0), (8400, -np.pi)]
# frequency in Hz, left over right in dB.
PORT_BALANCE = [(300, -1.5), (600, 0.5), (5000, 2), (8500, 2.3)]


def record(dry):
    shared_hz, rumble_hz, stair_hz, stair_flat = 7500, 42, 1820, .9
    size = next_fast_len(N)
    hz, spectrum = np.arange(size // 2 + 1) * SR / size, rfft(dry, size)
    shared = 1 / (1 + (shared_hz / (hz + 1)) ** 10)
    spectrum = (1 - shared) * spectrum + shared * spectrum[0]
    spectrum = spectrum / (1 + (rumble_hz / (hz + 1)) ** 4)
    steps = 2 * np.pi * np.maximum(hz - PORT_PHASE[-1][0], 0) / stair_hz
    lead = np.interp(hz, *np.transpose(PORT_PHASE)) - (steps - stair_flat * np.sin(steps)) / 2
    sides = np.array([[.5], [-.5]])
    balance_db = np.interp(hz, *np.transpose(PORT_BALANCE))
    ports = np.exp(1j * lead * sides) * linear_from_db(balance_db * sides)
    rounded = np.tanh(1.191 * irfft(spectrum * ports, size)[:, :N]) / 0.9
    top = signal.ellip(8, .3, 60, 16000, fs=SR, output="sos")
    return low_pass(signal.sosfilt(top, rounded))


dry = scene()
out = record(dry)
bounce(out)
```